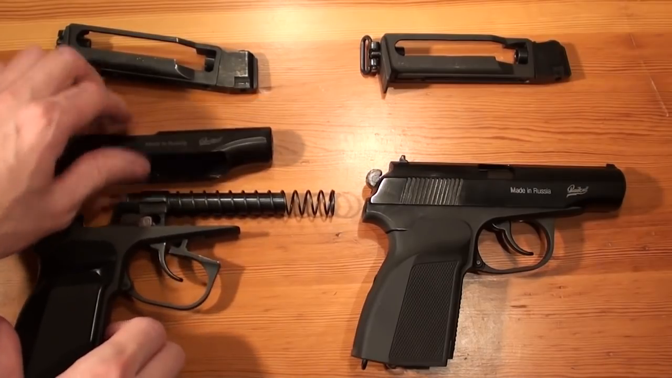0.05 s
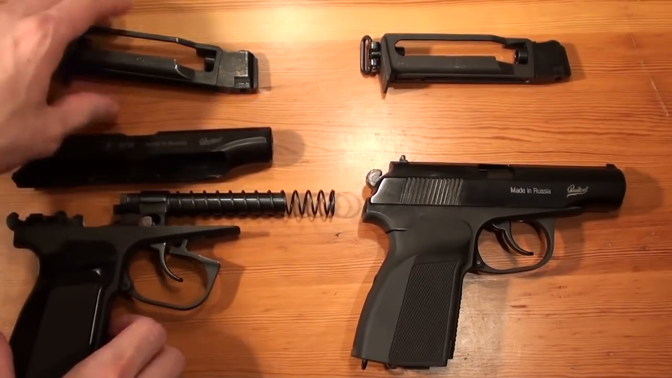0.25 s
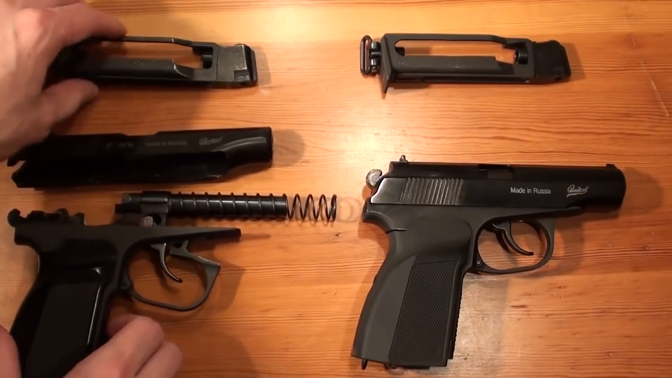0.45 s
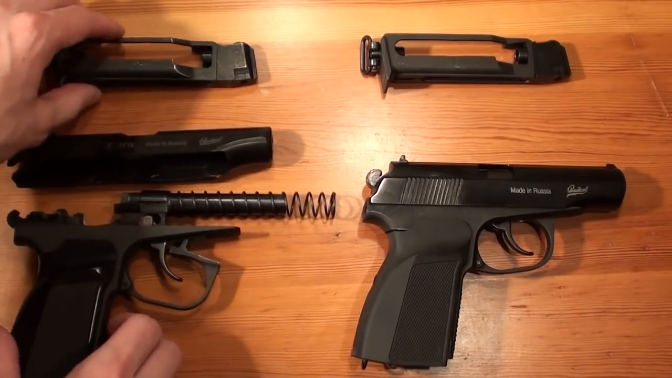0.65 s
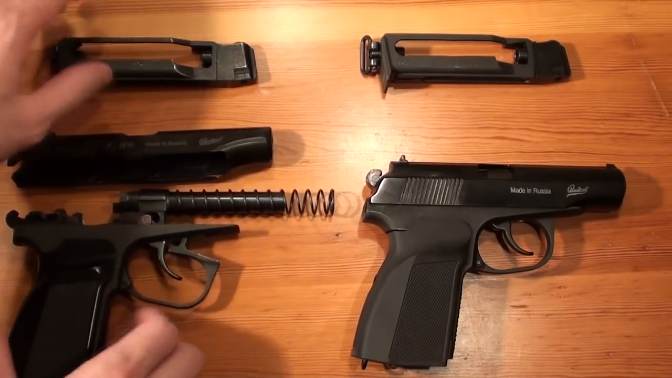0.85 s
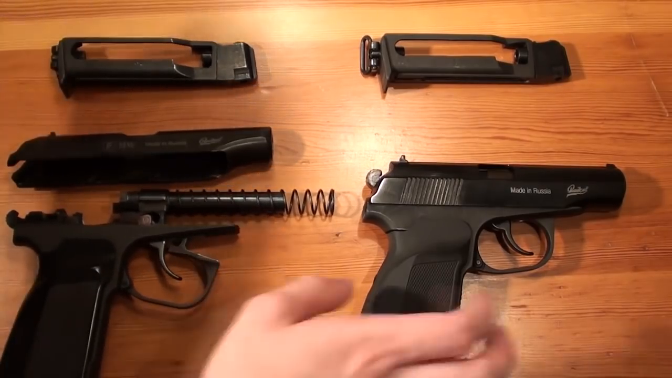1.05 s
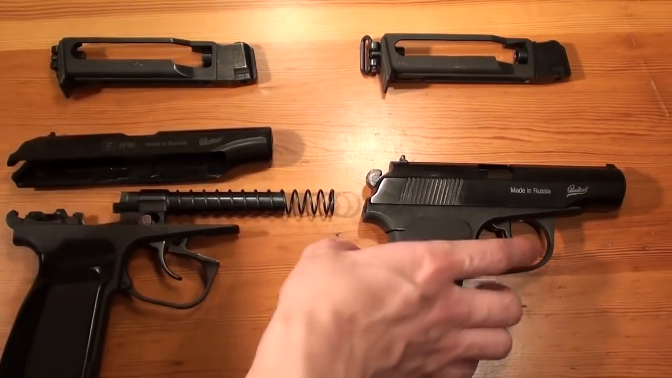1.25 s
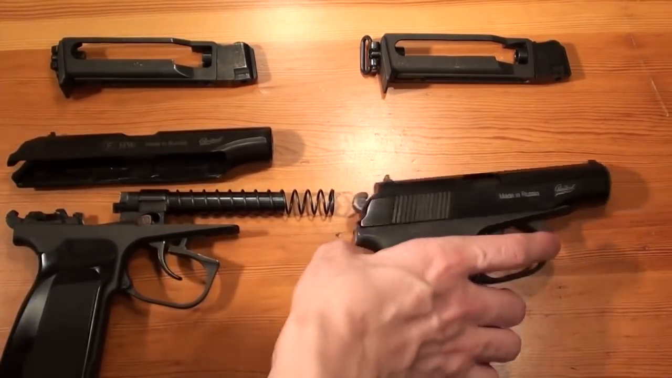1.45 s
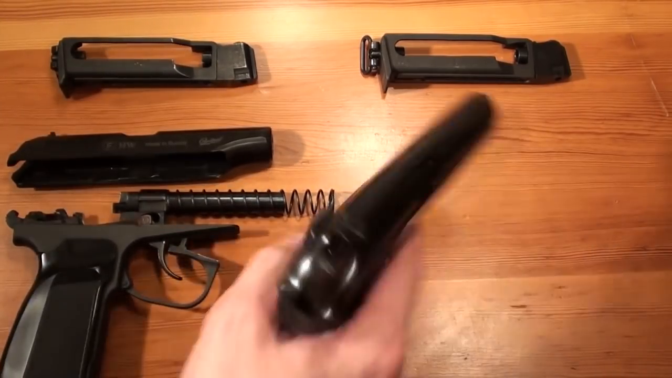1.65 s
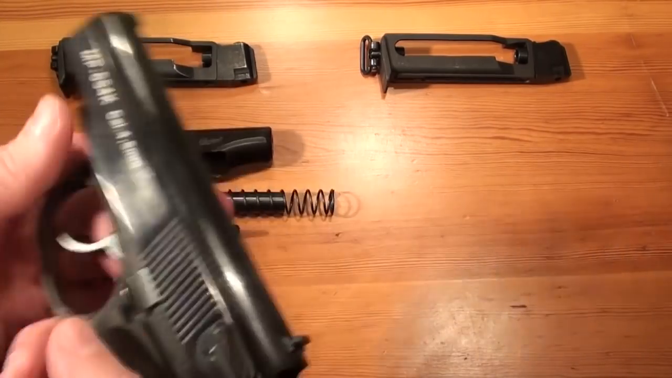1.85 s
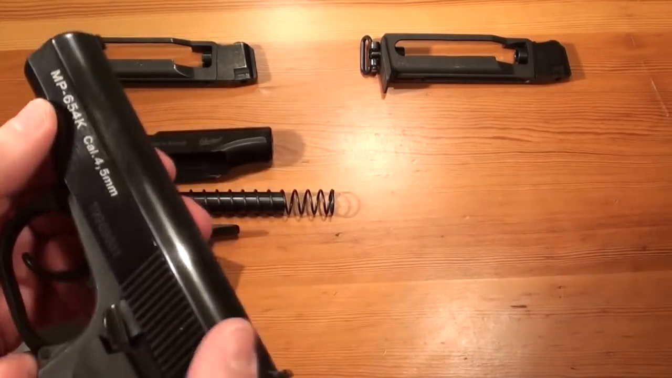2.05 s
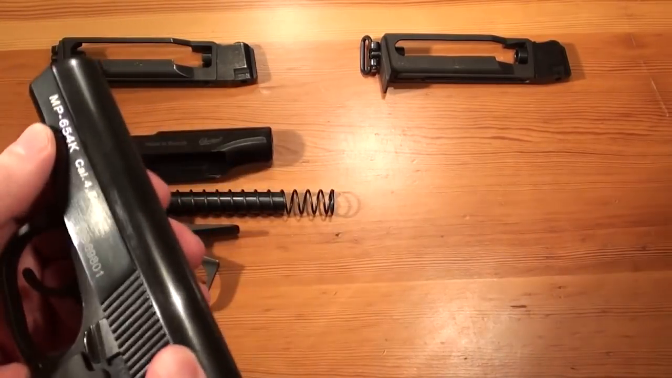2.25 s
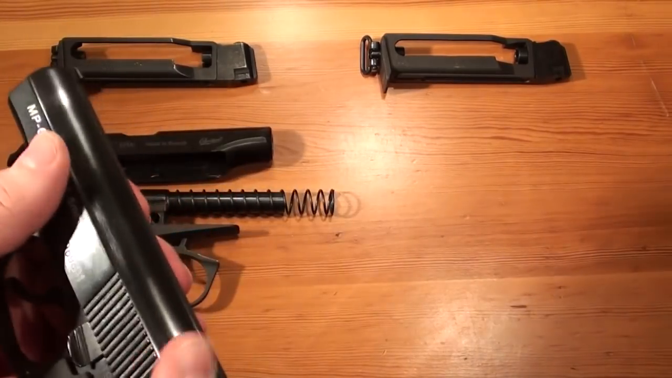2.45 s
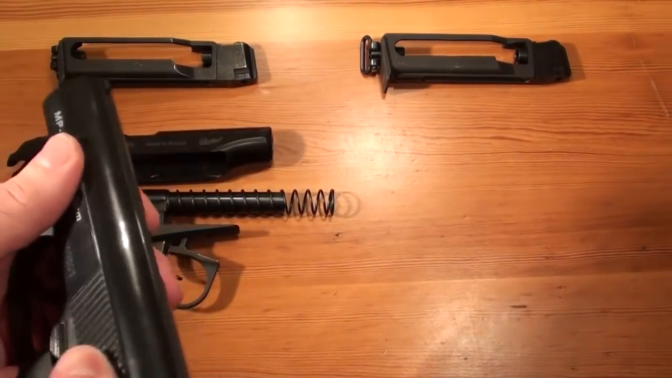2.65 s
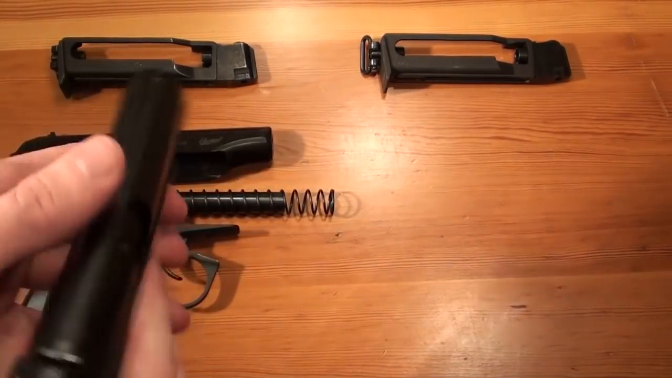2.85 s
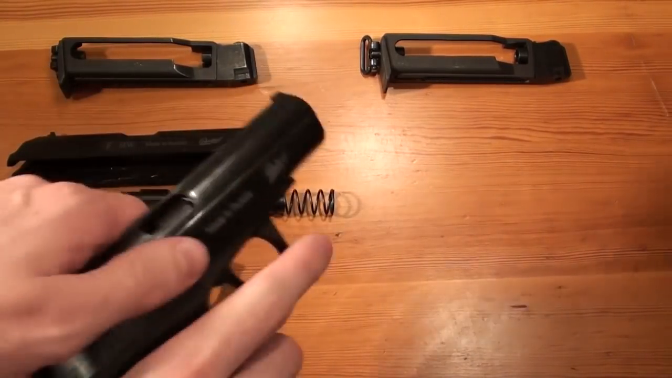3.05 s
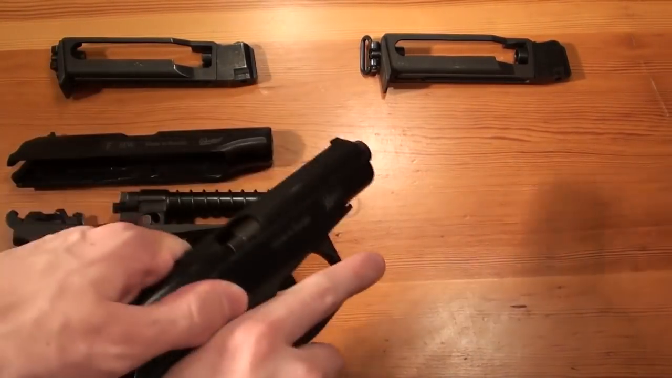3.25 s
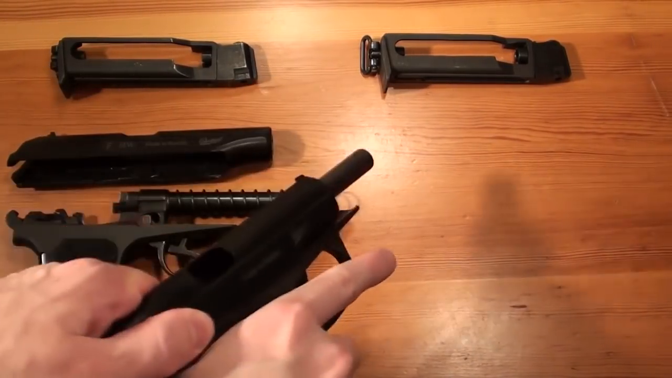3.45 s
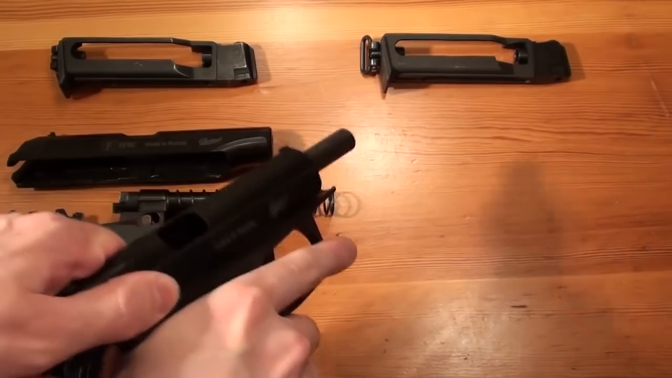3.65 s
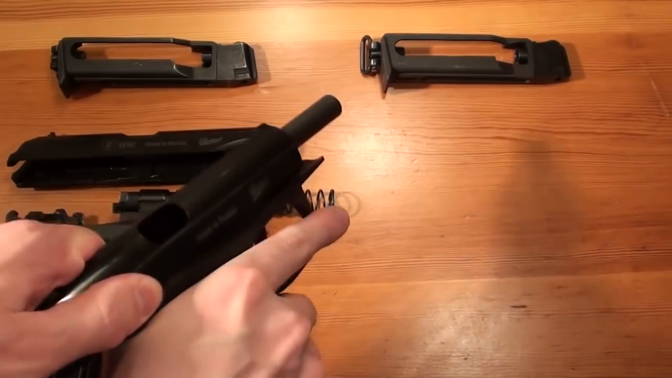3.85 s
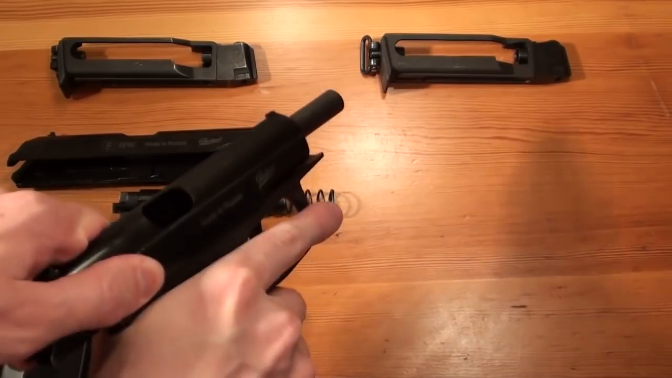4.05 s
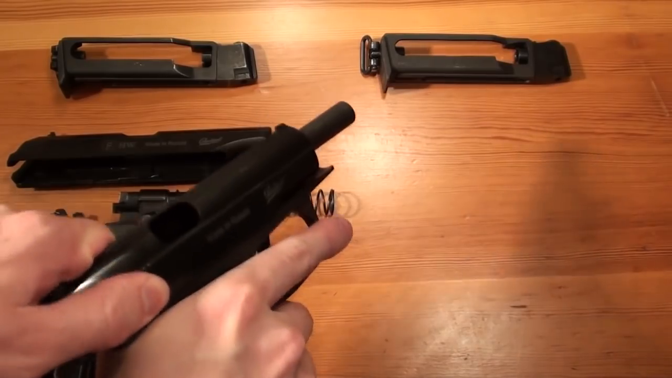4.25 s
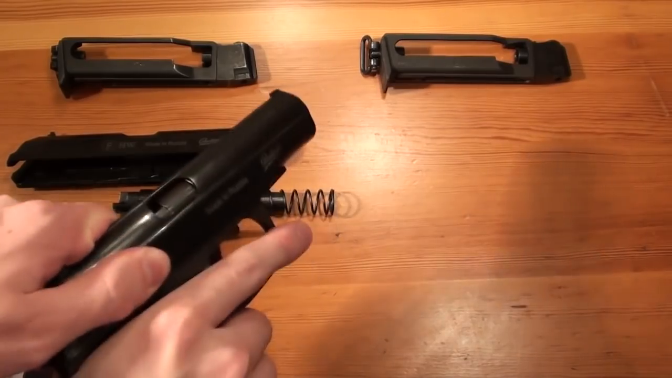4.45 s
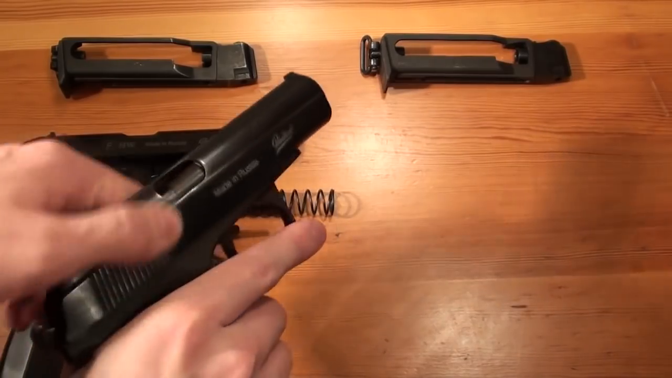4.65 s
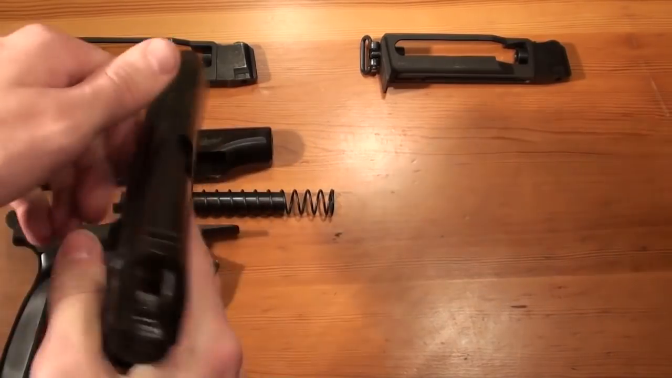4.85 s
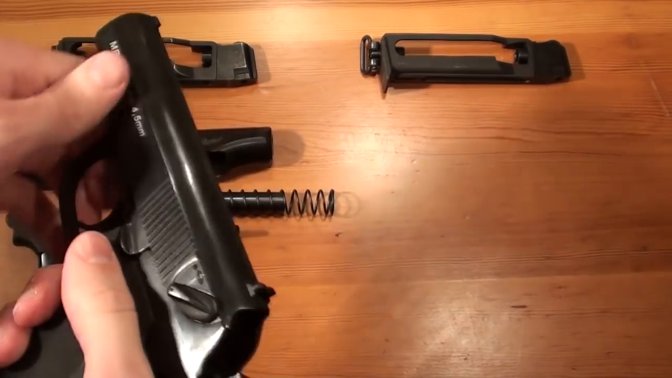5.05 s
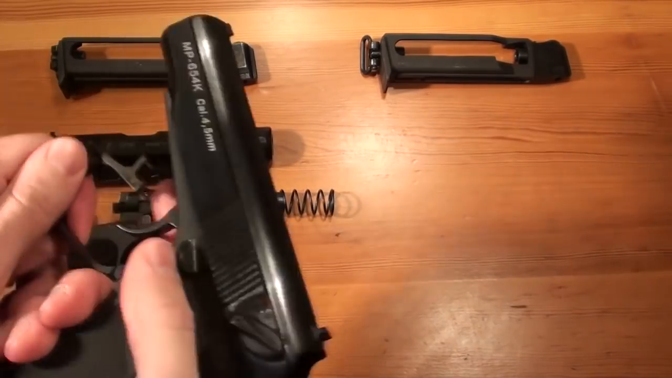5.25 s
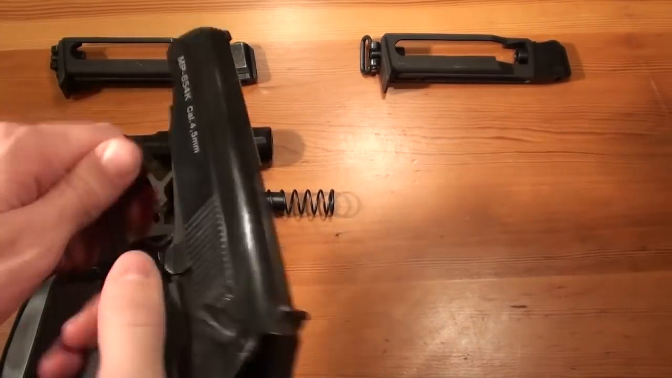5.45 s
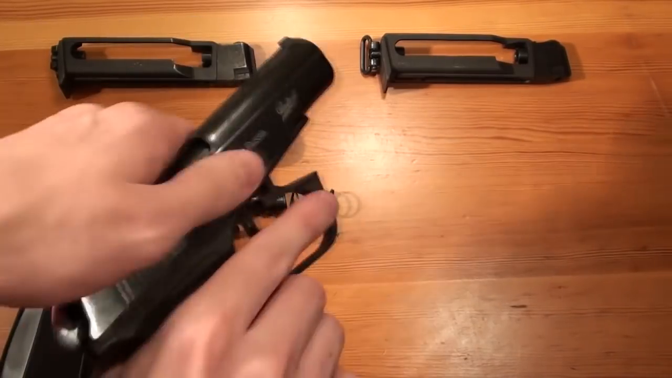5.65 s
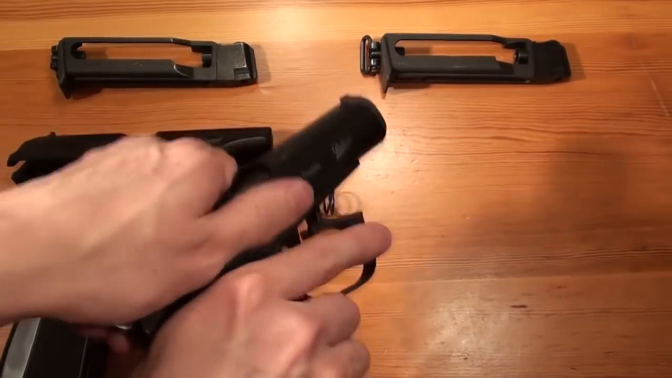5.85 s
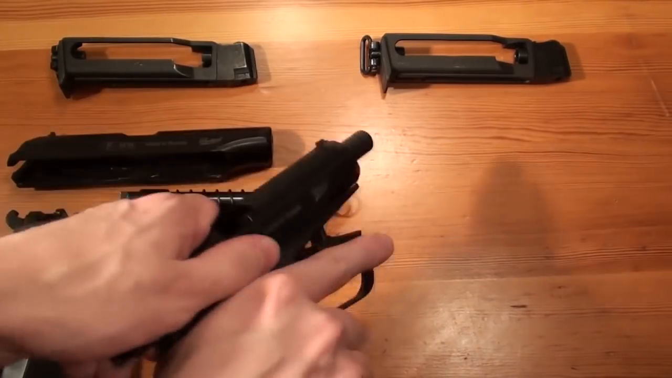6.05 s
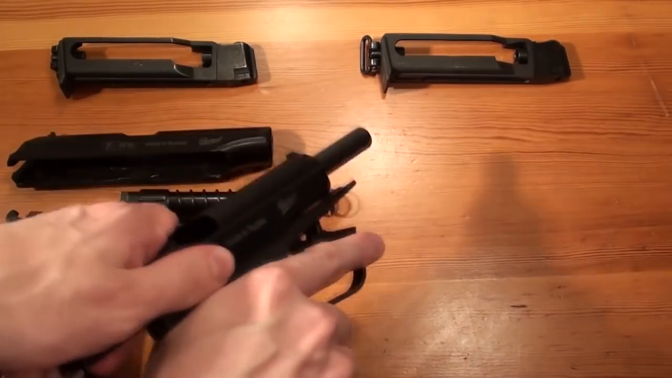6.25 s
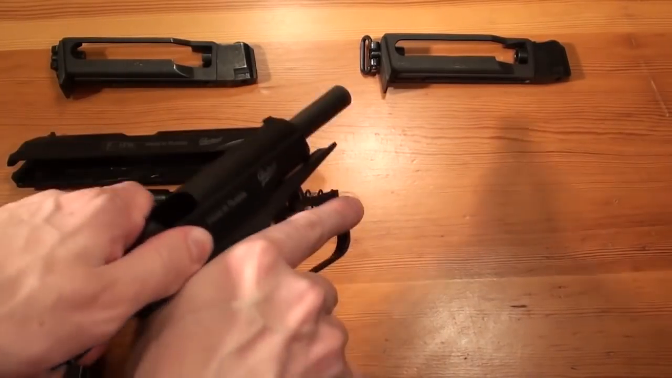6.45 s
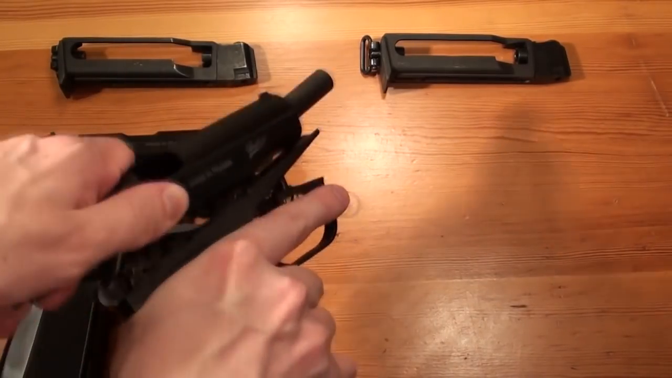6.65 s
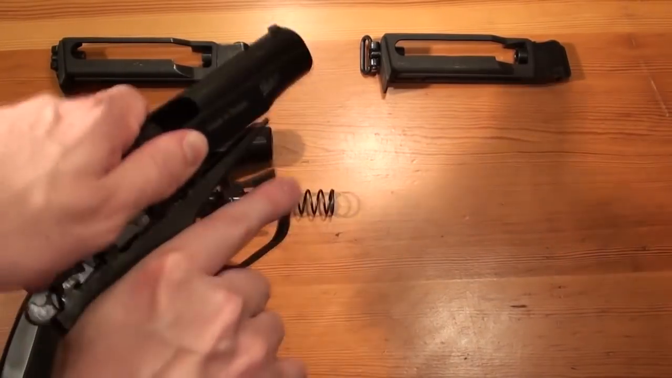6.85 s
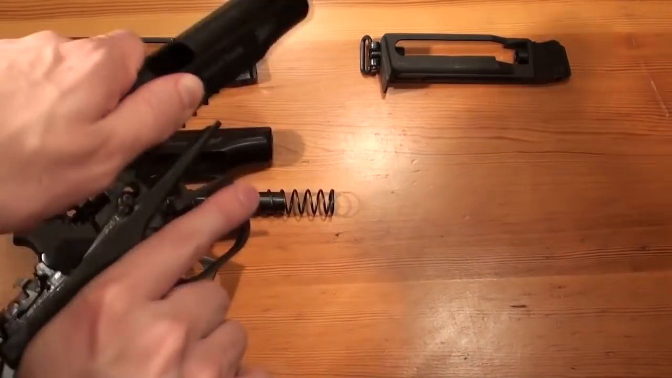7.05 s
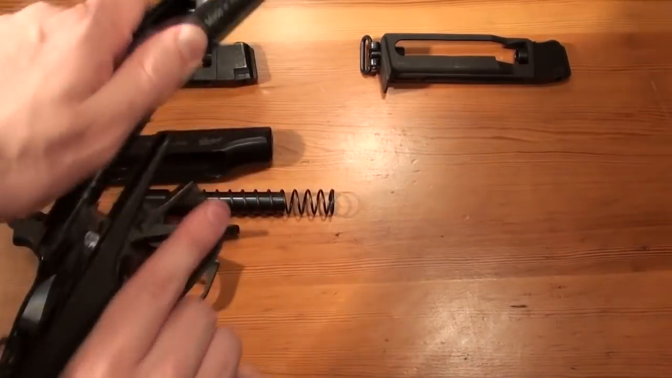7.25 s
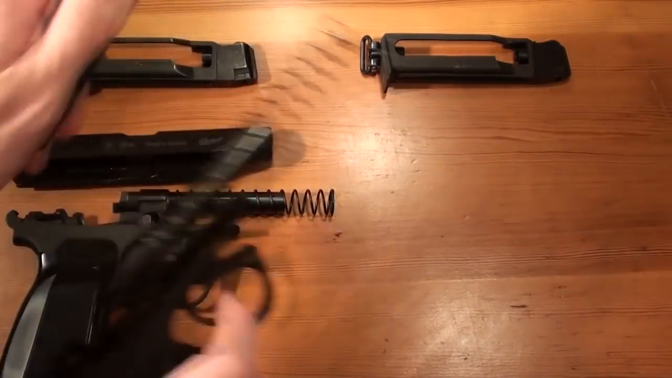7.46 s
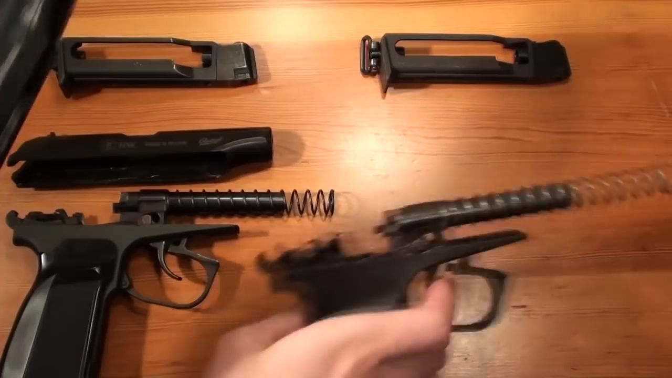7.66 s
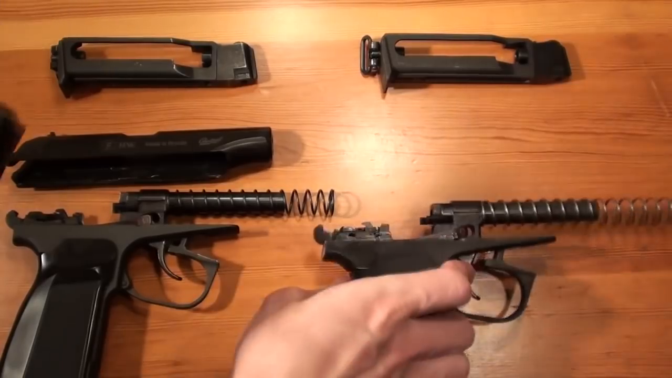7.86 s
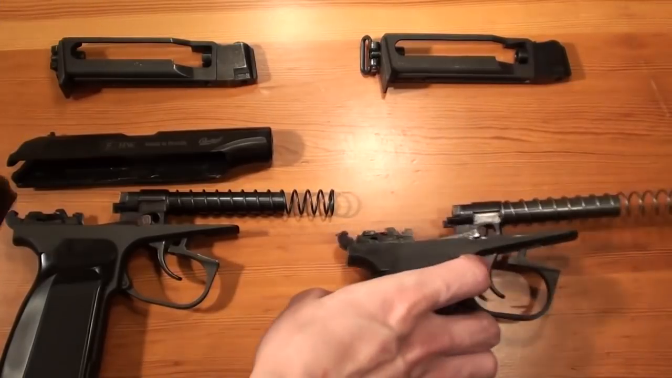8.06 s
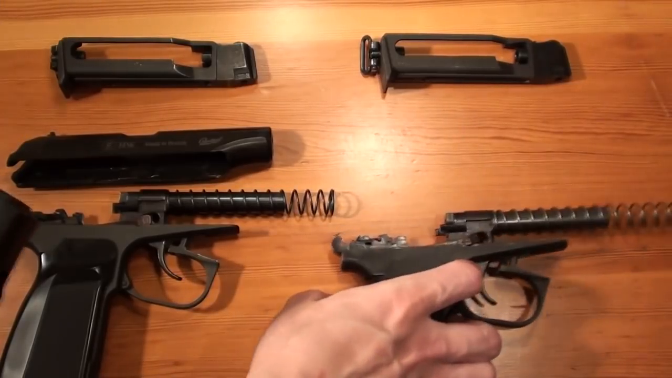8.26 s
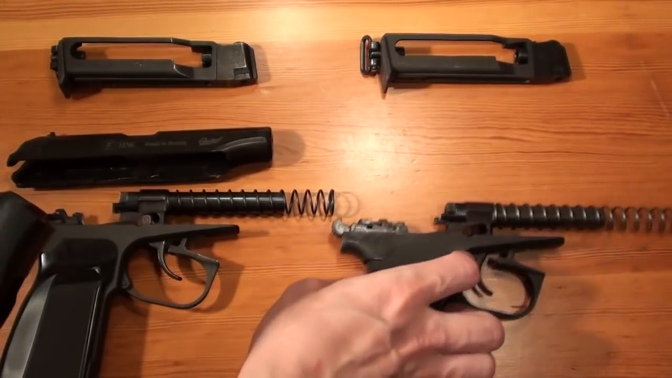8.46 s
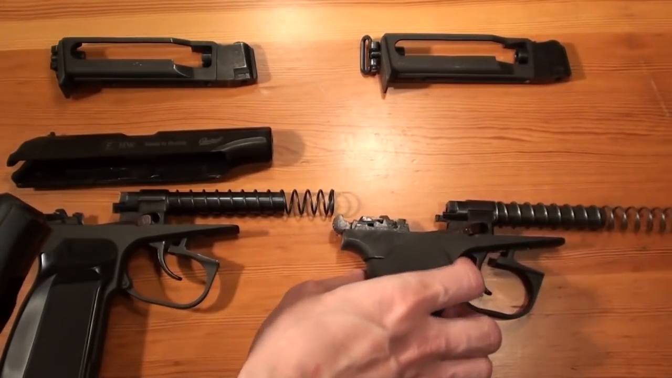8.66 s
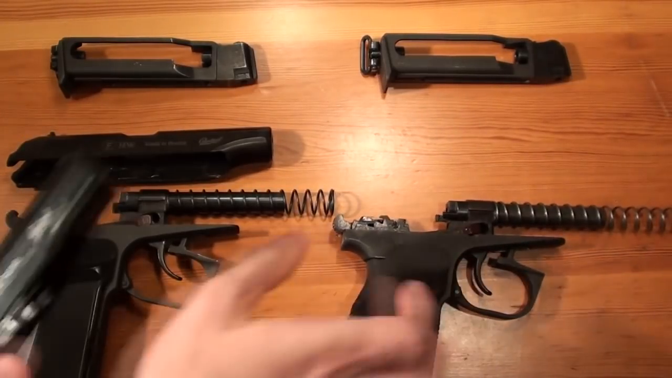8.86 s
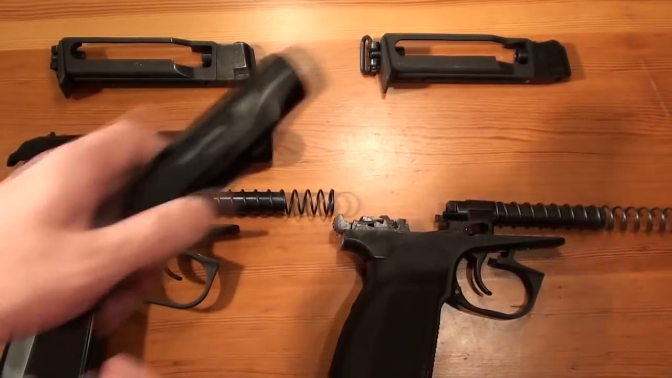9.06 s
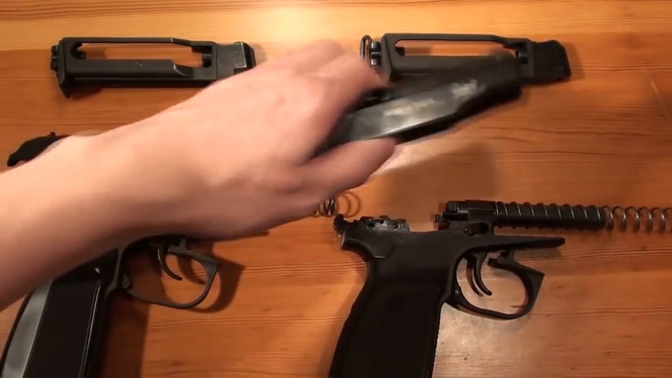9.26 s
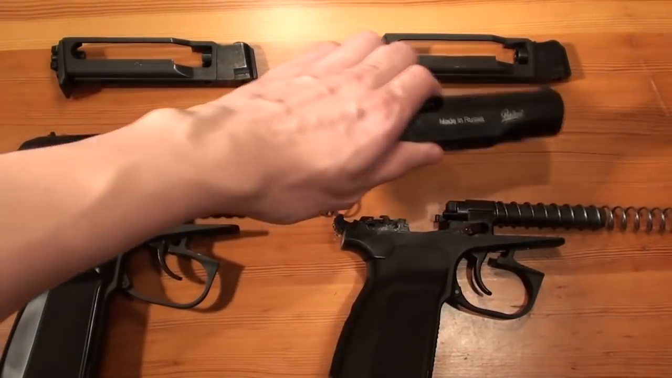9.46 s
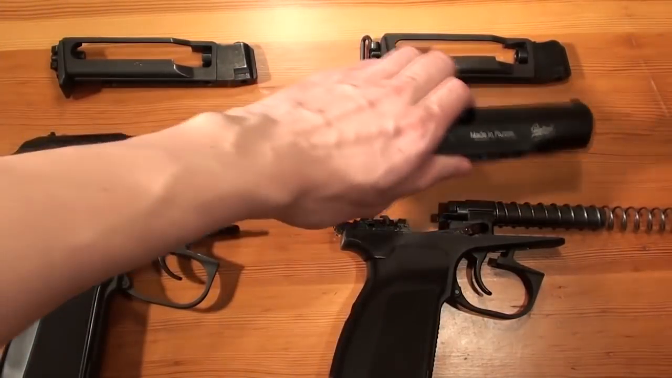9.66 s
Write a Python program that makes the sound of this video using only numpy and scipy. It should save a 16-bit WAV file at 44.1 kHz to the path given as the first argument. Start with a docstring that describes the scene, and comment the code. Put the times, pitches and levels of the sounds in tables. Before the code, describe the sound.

Close-up pistol stripping indoors: a sharp lever snap, two hard slide slams, dense metallic rattling, a ringing spring, then parts gently set on wood.

```python
"""In a small furnished room two hands strip a steel air pistol over a wooden table, close under a camera.
Catches click, the slide scrapes on its rails and slams into its stops: impacts and slips excite steel modes.
Parts knock and drag on the table and ring its wood; a low noise rumbles, then rustles like cloth, and skin hisses.
The room answers with decaying noise, the camera hisses, and its look-ahead limiter holds down the loudest blows."""
import sys
import numpy as np
from scipy import signal
from scipy.fft import rfft, irfft, next_fast_len
from scipy.io import wavfile
from scipy.ndimage import uniform_filter1d, minimum_filter1d, map_coordinates

SR = 44100
rng = np.random.default_rng(int(sys.argv[2]) if len(sys.argv) > 2 else 0)


def unload_wav(signal):
    """Save mono or channel-first audio to the path in sys.argv[1] as 16-bit WAV at rate SR, clipped to [-1, 1]."""
    wavfile.write(
        sys.argv[1],
        SR,
        np.round(np.clip(np.atleast_2d(signal).T, -1, 1) * 32767).astype(np.int16),
    )


N = 428211

# modes of the pistol's steel, before damping is added: (frequency [Hz], width [Hz], relative level [dB])
STEEL_MODES = [(735, 83, -2), (1290, 70, 9.5), (1450, 120, 7), (1850, 116, 1), (2046, 147, 1),
               (2580, 94, -3.5), (2780, 64, 2), (3110, 190, 4), (3440, 215, -1), (3800, 220, -3.5),
               (4510, 50, -10.5), (4730, 52, -2), (5290, 190, -1.5), (5800, 33, -2.5), (6400, 120, 2),
               (7310, 170, 1.5), (7500, 36, -8.5), (8030, 40, -3), (9240, 67, 0), (9500, 37, -9.5),
               (10300, 48, -3), (11350, 83, -11.5), (11670, 83, -4.5), (13000, 120, -24), (13540, 490, -51)]


def amp(db):
    """Level law: the amplitude ratio of a level in dB."""
    return 10 ** (np.asarray(db) / 20)


def unit(x):
    """Normalization: the signal scaled to rms 1."""
    return x / np.sqrt(np.mean(x ** 2) + 1e-20)


def along(points, hz):
    """Interpolation of (frequency [Hz], value) points along a logarithmic frequency axis."""
    f, v = np.transpose(points)
    return np.interp(np.log(hz + 1), np.log(f + 1), v)


def filtered(x, response):
    """Linear filtering: the spectrum of x times a complex response of frequency."""
    padded = next_fast_len(N + SR // 2)
    spectrum = rfft(x, padded) * response(np.fft.rfftfreq(padded, 1 / SR))
    return irfft(spectrum, padded)[..., :N]


def resonant(modes):
    """Modal superposition: damped resonators of (frequency [Hz], width [Hz], level [dB]) in alternating sign."""
    def response(f):
        total = 0
        for k, (center, width, db) in enumerate(modes):
            loss = 1j * f * width
            total = total + (-1) ** k * amp(db) * loss / (center * center - f * f + loss)
        return total
    return response


def rush(spectrum, alike):
    """Partial coherence: stereo noise of rms 1 whose mid and side shares set the left-right likeness."""
    def mid_and_side(hz):
        turn = np.arccos(np.clip(along(alike, hz), -1, 1)) / 2
        return amp(along(spectrum, hz)) * [np.cos(turn), np.sin(turn)]
    mid, side = filtered(rng.standard_normal((2, N)), mid_and_side)
    return unit(np.array([mid + side, mid - side]))


def grit(per_s, spread_db):
    """Stick-slip friction: sparse random impulses of either sign, with a long tail of sizes."""
    chance, sign, size = rng.random((3, N))
    slips = (chance < per_s / SR) * np.sign(sign - .5)
    return unit(slips * amp(-spread_db * np.log(1 - size)))


def strokes(rows):
    """Exponential envelopes: gains that rise, hold and fall in dB; each further column shifts a copy by its dB."""
    slope_db = 20  # a rise or fall time spans this much
    t, out = np.arange(N) / SR, np.zeros((len(rows[0]) - 4, N))
    for s, hold, db, rise, fall, *over_db in rows:
        before = np.maximum((s - t) / max(rise, 1e-3), 0)
        after = np.maximum((t - s - hold) / max(fall, 1e-3), 0)
        envelope = amp(db - slope_db * np.minimum(before + after, 10))
        out += amp(np.array([0, *over_db]))[:, None] * envelope
    return out


def blows(contacts, struck, contact_ms, damping, rattle, crack):
    """Impact excitation: contacts crack and ring modes the hand damps, sparing and detuning two.

    Returns two rows: direct sound, and sound sent into the room."""
    # borders between the modes of frame, slide, catches and pins: (frequency [Hz])
    borders_hz = [1700, 4000, 7200]
    slide_follows, catches_follow = 0.19, 0.57  # shares of the treble level that these parts follow
    crack_hz, crack_dulls = 10350, 0.35  # corner [Hz]; dB the corner drops per dB of lost treble
    out, t = np.zeros((2, N + SR)), np.arange(SR // 16) / SR
    hz, width, mode_db = np.transpose(STEEL_MODES)
    part = np.searchsorted(borders_hz, hz)
    share = amp(mode_db) / np.sqrt(np.bincount(part, amp(2 * mode_db)))[part]  # each part has energy 1
    for s, db, low_hz, high_hz, treble_db, room_db in contacts:
        frame_db, slide_db, catch_db = struck[int(low_hz > borders_hz[0])]
        slide_db = slide_db + slide_follows * treble_db
        catch_db = catch_db + catches_follow * treble_db
        part_db = np.array([frame_db, slide_db, catch_db, treble_db])
        level_luck, pitch_luck = rng.standard_normal((2, len(hz)))
        pitch = hz * (1 + 0.026 * pitch_luck)
        nearest = [np.argmin(np.abs(hz - loud_hz)) for loud_hz in (low_hz, high_hz)]
        pitch[nearest] = low_hz, high_hz
        spared = np.isin(np.arange(len(hz)), nearest)
        added = np.where(spared, np.where(part > 0, .035, .018), damping)  # width over frequency
        decay = np.pi * (width + added * hz)
        gain = np.where(spared, np.where(part > 0, .7, 1.1), share * amp(3.14 * level_luck))
        gain = amp(part_db[part]) * gain
        gain[::2] *= -1  # neighbouring modes start in opposite phase
        ring = gain @ (np.exp(-decay[:, None] * t) * np.sin(2 * np.pi * pitch[:, None] * t))
        crack_noise, rattle_noise = rng.standard_normal((2, len(t)))
        keep = np.exp(-2 * np.pi * crack_hz * amp(crack_dulls * treble_db) / SR)  # a dull contact cracks dully
        snap = signal.lfilter([1], np.convolve([1, -keep], [1, -keep]), crack_noise)
        snap = snap * np.exp(-t / 0.0025)
        ring = ring + crack * amp(0.3 * treble_db) * snap * np.linalg.norm(ring) / np.linalg.norm(snap)
        push = rattle * rattle_noise * np.exp(-(1000 * t / contact_ms) ** 2)  # faces rattle while they touch
        hit = signal.fftconvolve(ring, push + (t == 0))[:len(t)]
        hit = amp(db) * hit / np.abs(hit).max()
        # summed over all directions the rattle's colour evens out
        even = amp(room_db) * ring * np.linalg.norm(hit) / np.linalg.norm(ring)
        out[:, round(s * SR):][:, :len(t)] += [hit, even]
    return out[:, :N]


def clicks():
    """Impact of steel on steel: short contacts ring the modes of frame or slide."""
    # contacts, levels ahead of radiation and limiter: (time [s], peak level [dB], two loudest rings [Hz], [Hz],
    # treble level [dB], room over direct level [dB])
    contacts = [(1.7493, -41, 1366, 4000, -22, -5), (1.879, -43, 3820, 6400, -7, -15),
                (2.161, -23, 2630, 5840, -29, -12), (2.5524, -44, 1850, 5700, -16, -13),
                (3.0061, -42, 1770, 8050, -25, -2), (3.024, -37.5, 1490, 4600, -21, -8),
                (3.0844, -21, 1210, 5200, -90, -6), (3.1004, -23, 1280, 7500, -45, -12),
                (3.2075, -34.5, 1280, 4340, -19, -1), (3.236, -18.5, 3680, 7440, -16, -8),
                (3.257, -25, 1290, 5600, -31, -18), (3.2906, -14.5, 1270, 3650, -50, -5.5),
                (3.3143, -12, 1190, 6600, 12, -8), (3.3765, -18, 1880, 6400, -11, -3),
                (3.4162, -10.5, 2200, 4000, 8, 7), (3.4213, -14.5, 1470, 9800, -9, 8.5),
                (3.4333, -8, 3730, 6140, 7, 4.5), (3.4453, -5.5, 3170, 8700, -4.5, 3.5),
                (3.6278, -5, 1450, 5270, -19, -1.5), (3.6358, -11, 1480, 4870, -0.5, -2.5),
                (3.8901, -14.5, 1950, 4184, -45, -8), (3.924, -8, 2190, 6600, -9.5, 2),
                (4.0167, -17, 1440, 4550, -33, -9), (4.095, -24.5, 1330, 6400, -4, 3),
                (4.1042, -16, 3050, 4600, -5, -18), (4.3944, -39, 1390, 7900, 12, -1),
                (4.4271, -24, 2000, 6040, -6, 4), (4.4401, -9.5, 1310, 6600, 4, 14.5),
                (4.8755, -36.5, 3140, 4300, -25, -10), (5.0776, -36, 3080, 9500, -9, -2),
                (5.227, -22, 3110, 7240, -7, -4), (5.2639, -18.5, 3340, 4930, -34, -2),
                (5.2913, -18, 3070, 5260, -4, -7), (5.297, -14, 3520, 9500, -20, -25),
                (5.3048, -26, 3170, 5050, -8, -20), (5.4243, -10.5, 3622, 6024, -10.5, 0),
                (5.718, -34.5, 3930, 8860, -6, -17), (5.7287, -40, 2480, 5700, -23, -13),
                (5.7916, -27, 1290, 4300, -67, -8.5), (5.915, -26, 1280, 5020, -32, -2.5),
                (5.9417, -23, 1296, 6460, -23, -12), (5.9858, -32.5, 1290, 4510, -36, -13),
                (6.067, -13.5, 1290, 5840, -14.5, 3), (6.104, -5.5, 3340, 6160, -10, -4.5),
                (6.1904, -5, 1362, 5200, -16, -1.5), (6.2084, -9.5, 1373, 4680, -3, 1.5),
                (6.2211, -12.5, 2964, 4610, -23, 4), (6.2871, -14.5, 1450, 4630, -34, -5.5),
                (6.3088, -8.5, 1361, 4540, -29, -12.5), (6.4877, -34.5, 1340, 5250, -41, -8),
                (6.5174, -23.5, 1375, 6330, -56, -18), (6.5241, -19.5, 1350, 4190, -37, -4),
                (6.6638, -8.5, 2870, 5000, 8, -3.5), (6.7353, -5, 1500, 5040, -17, -13.5),
                (6.8825, -15, 3240, 4650, -2, 14.5), (6.8909, -4.5, 3860, 4960, -19, -30),
                (6.9065, -9, 3800, 8840, 9, 8.5), (6.9251, -32, 3730, 4170, -22, -7),
                (6.9489, -14, 2860, 4200, -12, -31), (6.99, -26, 1310, 4730, -22, 9.5),
                (7.0246, -19, 2780, 4200, -6, -15), (7.0628, -5.5, 3070, 8500, -43, 1.5),
                (7.0692, -11, 2750, 5330, 2.5, 4), (7.1086, -13, 2960, 4200, -2, -17),
                (7.1304, -20, 3110, 4110, -14, -22), (7.1407, -24, 3150, 5120, -25, -10),
                (7.1843, -26, 3000, 4960, -5, -2), (7.2177, -20, 2900, 5100, 7, 1.5),
                (7.256, -16.5, 2960, 4860, 7, -1), (7.2636, -8, 1815, 4520, -22, -2.5),
                (7.3298, -16.5, 2780, 4660, -8, -1.5), (7.3755, -21, 2780, 6700, -9, 8),
                (7.3908, -24.5, 2700, 6900, -17, -14), (7.4032, -19, 2740, 5060, 7, 1),
                (7.4226, -13.5, 2740, 9990, 14, -34), (7.4307, -17.5, 2730, 7750, 7, -22),
                (7.591, -37.5, 4000, 4500, -37, -6), (8.396, -26, 1450, 6020, -3.5, -3),
                (8.411, -37, 3000, 6400, 3, -17), (8.4959, -33.5, 2400, 5020, -22, 5),
                (8.507, -37, 2275, 4180, -35, 5.5), (8.5671, -22.5, 1280, 4620, -33, -5.5),
                (8.6993, -42.5, 2370, 4700, -37, 2.5), (8.7984, -48, 2830, 5200, -13, 3),
                (8.9989, -44, 2800, 3500, -26, -12), (9.2516, -41.5, 2200, 7500, -24, -3)]
    # other modes, for a low ring on the frame or on the slide: (frame [dB], slide [dB], catches [dB])
    frame_hit = (-7.5, -3, 0)
    slide_hit = (-23, -7.5, -4.4)
    return blows(contacts, [frame_hit, slide_hit], contact_ms=3.96, damping=0.094, rattle=0.34, crack=0.89)


def slams():
    """Impact with long contact: sprung parts are driven into their stops and rattle there."""
    # slams, levels ahead of radiation and limiter: (time [s], peak level [dB], two loudest rings [Hz], [Hz],
    # treble level [dB], room over direct level [dB])
    stops = [(3.452, 7, 3110, 7120, 0.5, 1), (4.457, 8, 2860, 5360, 0.5, 1),
             (6.897, -4, 3800, 4120, -34, 0)]
    # other modes of a part at its stop: (frame [dB], slide [dB], catches [dB])
    stop_hit = (-7, 1.2, 0.82)
    return blows(stops, [stop_hit] * 2, contact_ms=11.3, damping=0.066, rattle=0.3, crack=0.84)


def rails():
    """Friction excitation: dense slips between slide and frame excite the same steel."""
    # strokes of the slide, ahead of the gains below: (time [s], hold [s], scrape level [dB], rise [s], fall [s],
    # fizz over scrape level [dB])
    slide_strokes = [(3.322, 0.037, -31, 0.0022, .02, 10), (3.412, 0.0009, -20, 0.0073, 0.0022, -24),
                     (3.916, .004, -45.5, 0.017, .002, 14), (4.425, .001, -13.5, 0.0052, 0.0015, -2),
                     (5.235, .001, -55, .002, .012, -7), (5.275, .001, -24.5, 0.019, 0.012, -22),
                     (6.059, .003, -19, 0.0081, 0.0022, -22), (6.115, .001, -32, .002, 0.071, 4),
                     (6.183, .004, -22.5, 0.021, .002, -1), (6.23, 0.1, -39, .002, .002, -16),
                     (6.637, 0.0237, -11, 0.016, 0.0016, -19), (6.91, 0.052, -28, 0.0022, .016, -4),
                     (6.968, .001, -49, .002, .2, -4), (7.06, .001, -22, 0.0029, .002, -3),
                     (7.075, 0.014, -28, .002, 0.031, 1), (7.231, 0.014, -52, 0.087, .002, 5)]
    scraping, fizzing = strokes(slide_strokes)
    steel = resonant([(hz, width + 130, db) for hz, width, db in STEEL_MODES])
    slips = grit(per_s=3500, spread_db=4.0)
    # scrape and fizz part at 4700 Hz
    scrape = unit(filtered(slips, lambda f: steel(f) / (1 + (f / 4700) ** 8)))
    fizz = unit(filtered(slips, lambda f: steel(f) / (1 + (4700 / (f + 1)) ** 8)))
    return amp(-9.0) * scraping * scrape + amp(-6.5) * fizzing * fizz


def lever():
    """Impulse response: the safety lever snaps over its detent and rings its own modes under the thumb."""
    # lever modes, before damping is added: (frequency [Hz], width [Hz], relative level [dB])
    lever_modes = [(1890, 360, -16), (3230, 120, -19), (5570, 75, -3), (5734, 45, -3.5), (7300, 25, -10.5),
                   (7500, 63, -7), (7810, 530, -6), (8600, 61, -9.5), (9530, 47, -10), (9930, 25, -10),
                   (10990, 76, -13.5), (14500, 90, -26)]
    # the snap, ahead of radiation and limiter: (time [s], peak level [dB])
    snap_s, snap_db = (2.7272, 5.5)
    blow = np.arange(N) == round(snap_s * SR)
    ring = resonant([(hz, width + 0.063 * hz, db) for hz, width, db in lever_modes])
    snap = filtered(blow, lambda f: ring(f) * 1j * f / (1500 + 1j * f))
    return amp(snap_db) * snap / np.abs(snap).max()


def spring():
    """Repeated plucking: the slide's mouth ticks over the recoil spring's coils and sets them singing."""
    # modes of the spring on the barrel, before widening: (frequency [Hz], width [Hz], relative level [dB])
    coil_modes = [(1690, 41, -5), (2740, 15, -9), (3530, 35, -11), (4345, 43, -13), (5100, 160, -5),
                  (5600, 160, -7), (6630, 130, -4.5), (7750, 40, -2), (8670, 140, -1.5), (9990, 41, 0),
                  (11700, 83, -7), (11960, 180, 0.5), (12300, 24, -4), (13500, 110, -9)]
    # the slide is drawn off, ahead of the gain below: (time [s], hold [s], level [dB], rise [s], fall [s])
    unwinding = [(7.275, 0.15, -31, .002, 0.019)]
    sing = resonant([(hz, width + 40, db) for hz, width, db in coil_modes])
    ticks = grit(per_s=910, spread_db=3.0)
    return amp(-3) * strokes(unwinding)[0] * unit(filtered(ticks, sing))


def pin():
    """Free vibration: a loose pin chimes in thin tones that decay exponentially."""
    # chimes: (time [s], level ahead of radiation [dB], frequency [Hz], 60 dB decay time [s])
    chimes = [(.088, -50, 4160, .25), (.004, -45, 4450, .09)]
    t, out = np.arange(N) / SR, np.zeros(N)
    for s, db, hz, t60 in chimes:
        decay = amp(db - 60 * np.abs(t - s) / t60)
        out += (t > s) * decay * np.sin(2 * np.pi * hz * t)
    return out


def table_top():
    """Plate resonance: knocks and drags ring the wood; a long contact is dull, a strong deep mode booms."""
    # table modes, the deepest first, before widening: (frequency [Hz], width [Hz], relative level [dB])
    wood_modes = [(137, 15, -4.5), (292, 6.3, -3), (419, 52, 3), (590, 15, 2.5), (743, 36, 5),
                  (1150, 180, 0), (1280, 55, 2.5), (1520, 250, -5), (1930, 200, -16), (2370, 250, 0),
                  (2800, 300, -27), (3210, 680, -9.5), (4000, 380, -22.5), (5040, 2200, -9.5)]
    # parts meet the table: (time [s], peak level [dB], contact time constant [ms], boost of the deepest mode [dB])
    knocks = [(.001, -10, 0.11, 3.5), (.5, -57, 0.5, 26), (1.274, -49, 0.96, 27), (1.286, -48.5, 0.61, 41),
              (1.345, -48, 0.16, 23), (8.395, -38, 0.18, -27), (8.411, -37, 0.11, 16),
              (8.566, -31.5, 0.44, 3.5), (8.665, -26, 0.51, 18), (8.744, -42, 0.73, 30)]
    # a part is pulled over the wood: (time [s], hold [s], rub level [dB], rise [s], fall [s],
    # boom over rub level [dB])
    drags = [(.404, 0.014, -47.5, 0.048, 0.039, -25), (1.472, 0.01, -52, 0.049, 0.086, 6.5)]
    out, f = np.zeros(N), np.fft.rfftfreq(SR // 2, 1 / SR)
    deep, *rest = wood_modes
    deep_hz, deep_width, deep_db = deep
    for s, db, contact_ms, boom_db in knocks:
        upper = [(hz, width + 25, level + rng.normal()) for hz, width, level in rest]
        wood = resonant([(deep_hz, deep_width, deep_db + boom_db)] + upper)
        knock = irfft(wood(f) / (1 + 2j * np.pi * f * contact_ms / 1000) ** 2)[:SR // 3]
        out[round(s * SR):][:len(knock)] += amp(db) * knock / np.abs(knock).max()
    rubbing, booming = strokes(drags)
    slips = grit(per_s=4400, spread_db=0.5)
    rubbed = resonant([(hz, width + 90, level) for hz, width, level in rest])
    rub = unit(filtered(slips, lambda f: rubbed(f) / (1 + 1j * f / 500) ** 2))
    boom = unit(filtered(slips, resonant([deep])))
    return out + rubbing * rub + booming * boom


def rustle():
    """Shaped noise: a low rumble turns to cloth rustle, skin on steel hisses high, both a little lumpy."""
    # spectra of the low noise and of skin: (frequency [Hz], relative density [dB per Hz])
    low_spectrum = [(35, -47), (60, -18), (512, -6), (1260, -17.5), (2350, -19.5), (3000, -19.5),
                    (3900, -48), (6600, -120)]
    skin_spectrum = [(1200, -9.5), (2500, -5), (5000, -7), (7500, -3), (10000, -10), (15000, -31)]
    # low noise, rumble of the table thud at the start, then cloth rustle, ahead of the lumps: (time [s], level [dB])
    low_rustle = [(0.0, -30), (0.16, -62), (0.65, -64), (1.2, -63.5), (2.54, -71.5), (3.3, -67),
                  (3.54, -66), (3.71, -73), (4.5, -69.5), (5.9, -69), (6.22, -64.5), (6.38, -69),
                  (7.171, -63.5), (7.47, -67), (8.41, -70), (8.6, -60.5), (9.22, -68.5), (9.71, -66)]
    # skin slides over steel, ahead of the gain below: (time [s], hold [s], level [dB], rise [s], fall [s])
    fingers = [(.768, .01, -73, .05, .12), (1.104, 0.0092, -72.5, .05, .35), (1.35, .01, -70, .01, 0.24),
               (1.63, 0.024, -69, .12, 0.075), (1.96, 0.019, -68, 0.35, 0.016),
               (2.14, 0.0077, -68, 0.088, 0.0088), (2.95, 0.0044, -73, .005, 0.034),
               (3.02, 0.0054, -73, .04, .08), (4.75, 0.011, -73, .01, 0.14), (4.88, .005, -74, 0.22, 0.03),
               (5.08, .005, -75, .25, 0.042), (5.666, .01, -66.5, 0.072, 0.09),
               (7.6, .17, -73.5, .01, 0.23), (8.044, .005, -80, .1, 0.17), (8.8, .005, -81, .02, 0.07),
               (9.0, 0.023, -69, 0.25, .6)]
    lumps = amp(2 * map_coordinates(rng.standard_normal(300), [np.linspace(0, 299, N)]))
    low_gain = amp(np.interp(np.arange(N) / SR, *np.transpose(low_rustle)))
    low = low_gain * rush(low_spectrum, [(100, 1.0), (600, 0.38)])
    skin = amp(10.5) * strokes(fingers)[0] * rush(skin_spectrum, [(3000, 0.88), (9000, 0.97)])
    return lumps * (low + skin)


def room(x, spread):
    """Diffuse reverberation: noise tails decay at each frequency's own rate, freshly drawn each quarter second."""
    # reverberation: (frequency [Hz], 60 dB decay time [s])
    decay_times = [(150, 0.27), (800, 0.37), (3000, 0.36), (9000, 0.29), (15000, 0.076)]
    out, step = np.zeros((2, N + SR)), SR // 4
    for at in range(0, N, step):
        hz, t, z = signal.stft(rng.standard_normal((2, SR // 2)), SR, nperseg=256)
        # bass and top treble reach both ports alike
        z[1] /= 1 + (hz[:, None] / 11000) ** 4 + 700 / (hz[:, None] + 50)
        decay = amp(-60 * t / along(decay_times, hz)[:, None])
        mid, side = signal.istft(z * decay, SR, nperseg=256)[1]
        rise = np.clip((np.arange(len(mid)) / SR - .003) / 0.00098, 0, 1)  # the first walls answer late
        tail = rise * [mid + spread * side, mid - spread * side]
        wet = signal.fftconvolve(x[None, at:at + step], tail / np.linalg.norm(tail[0]), axes=1)
        out[:, at:at + wet.shape[1]] += wet
    return out[:, :N]


def camera():
    """Stationary noise: steady hiss, with narrow-band noise heard as two faint unsteady tones."""
    # spectrum of the hiss: (frequency [Hz], relative density [dB per Hz])
    hiss_spectrum = [(12, -38), (20, -16.5), (239, -6), (298, -6), (334, -2), (363, -8), (493, -7.5),
                     (1110, -7.5), (1460, -6), (3190, -12), (3560, -8.5), (3870, -9.5), (15600, -15)]
    # coherence of the hiss: (frequency [Hz], left-right likeness [1])
    likeness = [(60, 0.54), (130, 0.91), (290, 0.34), (640, 0.03), (1410, 0.05), (3100, 0.44), (6820, 0.92),
                (15000, 1)]
    # the camera's own tones: (frequency [Hz], width of each of two resonators in series [Hz], level [dB])
    whine = [(3500, 120, -74.5), (7580, 49, -77)]
    hiss_db = -61.5
    out = amp(hiss_db) * rush(hiss_spectrum, likeness)
    for hz, width, db in whine:
        resonator = resonant([(hz, width, 0)])
        out = out + amp(db) * unit(filtered(rng.standard_normal(N), lambda f: resonator(f) ** 2))
    return out


def scene():
    """Superposition: close sources, their reverberation and the steady floor."""
    def steel_radiation(f):  # small parts radiate little bass
        return 1 / (1 + 1j * f / 14000) ** 2 * (1j * f / (750 + 1j * f)) ** 6 + amp(-29.5)

    def wood_radiation(f):  # nor does the table top radiate the deepest
        return (1j * f / (55 + 1j * f)) ** 4

    steel = clicks() + slams() + lever() + rails() + spring() + pin()
    near, far = filtered(steel, steel_radiation) + filtered(table_top(), wood_radiation)
    direct = near * amp([[.2], [-.2]])  # slightly stronger on the left
    return direct + amp(-3.5) * room(far, spread=0.33) + rustle() + camera()


def record(dry):
    """Gain reduction: a look-ahead limiter ducks just before a blow and lets go steadily; then the band limit."""
    threshold_db, release_db_per_s, top_hz = -10.5, 330, 15800
    ahead = round(0.0011 * SR)
    over_db = np.maximum(20 * np.log10(np.abs(dry).max(0) + 1e-9) - threshold_db, 0)
    over_db = -minimum_filter1d(-over_db, 2 * ahead + 1, origin=-(ahead // 2))  # running maximum
    ramp_db = release_db_per_s * np.arange(N) / SR
    cut_db = np.maximum.accumulate(over_db + ramp_db) - ramp_db
    held = dry * amp(-uniform_filter1d(cut_db, ahead))
    return filtered(held, lambda hz: hz < top_hz)


dry = scene()
out = record(dry)
unload_wav(out)
```